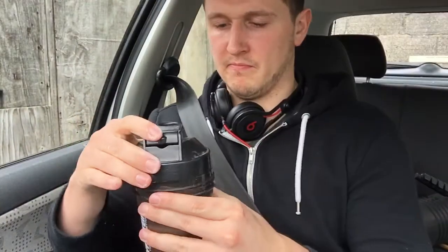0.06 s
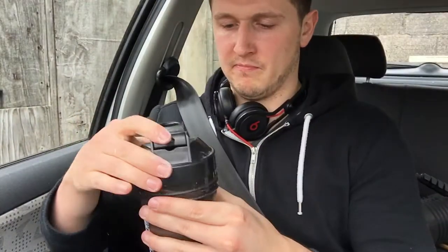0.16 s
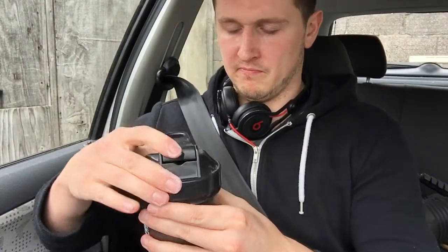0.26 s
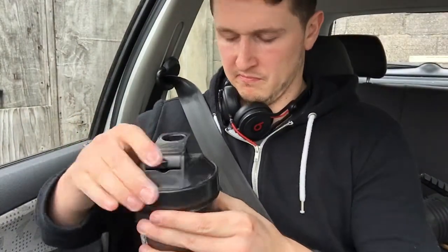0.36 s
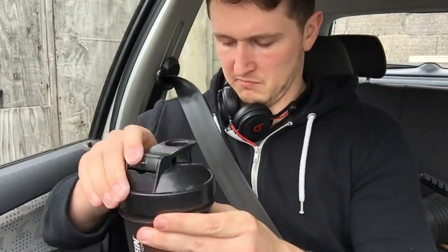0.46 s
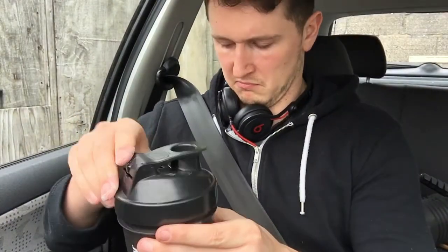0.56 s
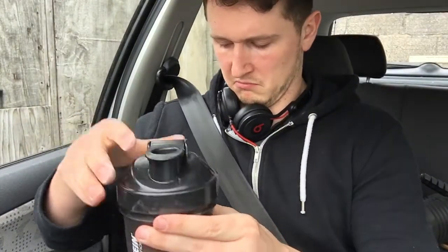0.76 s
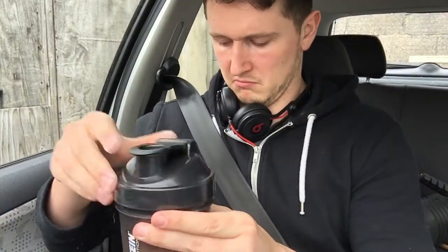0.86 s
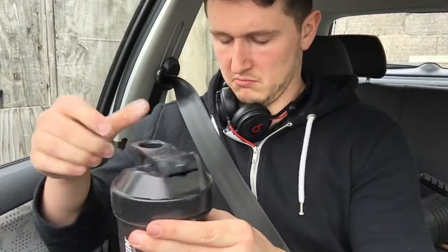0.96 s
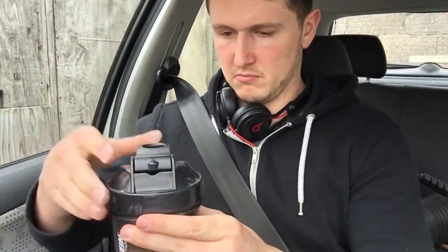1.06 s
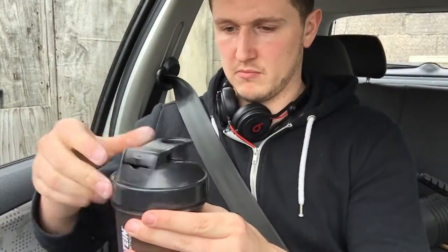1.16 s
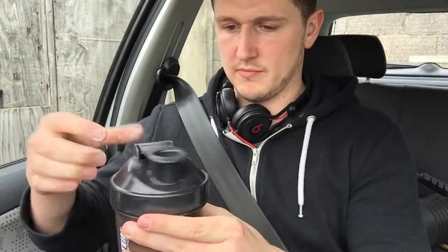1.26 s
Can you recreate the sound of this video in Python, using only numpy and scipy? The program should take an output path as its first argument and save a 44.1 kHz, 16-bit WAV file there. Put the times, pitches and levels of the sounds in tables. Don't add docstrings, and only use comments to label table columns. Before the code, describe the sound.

A plastic shaker bottle is handled close to a phone microphone in a small, dry car cabin. Light clicks lead to a very loud, sharp cap snap with hollow knocks at 0.24-0.28 seconds, then a smaller bounce at 0.38. From 0.42 to about 1.3, quieter uneven clicks, ticks and lid knocks rattle in flurries. A low idling-engine drone, rumble and faint hiss continue throughout.

```python
import sys
import numpy as np
from scipy import signal
from scipy.fft import rfft, irfft
from scipy.io import wavfile
from scipy.ndimage import uniform_filter1d

SR = 44100
rng = np.random.default_rng(int(sys.argv[2]) if len(sys.argv) > 2 else 0)


def volts(x):
    e = np.asarray(x, float) / 20
    return 10 ** e


def persist_wave(psi):
    counts = np.round(np.clip(psi, -1, 1) * 32767).astype(np.int16)
    wavfile.write(sys.argv[1], SR, np.atleast_2d(counts).T)


N = 57330

# start in seconds, peak in dB, ringing pitch in Hz,
# treble in dB, time for the ring to fall 60 dB in seconds.
CAP_SNAPS = [(.231, -25, 1490, -1, 0.022), (.3785, -15, 3340, -27, 0.014), (.238, -6.5, 2458, -8, 0.031),
             (.2475, 2.5, 6380, -2.5, 0.0061), (.248, 2, 1910, -21, 0.007), (.2495, -10, 3260, 2, 0.024),
             (.256, -7, 3566, -3.5, 0.013), (.2585, 2, 1404, -11.5, 0.013), (.2595, -15, 4000, 8, 0.0098),
             (.267, -15.5, 1300, -18, 0.029), (.276, -2, 3970, -23, 0.0054), (.279, -17, 1485, -13, 0.019),
             (.287, -23, 1130, -32, 0.022), (.377, -9, 4170, -11.5, 0.0099), (.375, -33, 2240, -16, .015),
             (.3775, -13, 1473, -18, 0.012), (.378, -12.5, 2277, -28, 0.01), (.379, -24, 2446, -37, 0.036)]
# start in seconds, peak in dB, ringing pitch in Hz,
# treble in dB, time for the ring to fall 60 dB in seconds.
LID_KNOCKS = [(0.041, -42, 2600, -7, 0.021), (0.107, -26, 3760, -2, 0.021),
              (0.127, -16, 1550, -5.5, 0.0029), (0.202, -28, 2400, -5, 0.0046),
              (0.495, -22.5, 2905, -9, 0.02), (0.502, -19.5, 1650, 0.5, 0.011),
              (0.5275, -14, 2820, -5, 0.016), (0.549, -37, 1730, 3, 0.021), (0.615, -40, 2360, -26, 0.015),
              (0.64, -29.5, 3940, -22, 0.067), (0.681, -25, 4100, -20, 0.025),
              (0.698, -17.5, 2450, -43, 0.016), (0.708, -15, 3200, -14, 0.01),
              (0.726, -36, 6040, -6, 0.008), (0.748, -33, 2480, -10, 0.037), (0.4697, -26, 2440, -10, 0.02),
              (0.833, -37, 2430, -5, 0.023), (0.863, -28, 2520, 1, 0.014), (0.921, -27, 3270, -8, 0.019),
              (0.942, -24.5, 4130, 1, 0.027), (1.0, -15.5, 2420, -5, 0.01), (1.095, -16, 2870, -25, 0.0017),
              (1.152, -25.5, 2000, -12, 0.0082), (1.261, -25.5, 6180, 12, 0.012),
              (1.278, -17, 2300, -5, 0.0074)]
# pitch in Hz, width in Hz, level in dB.
LID_RESONANCES = [(1300, 50, 3), (1550, 130, 0.5), (1900, 430, 8.5), (2400, 95, 2), (2545, 320, 6),
                  (3057, 540, 6), (3470, 300, 2.5), (3810, 270, -8), (4047, 130, -1), (4290, 270, -1.5),
                  (5470, 570, -10), (5980, 690, -1), (7110, 1000, -5.5)]
# frequency in Hz, level in dB.
CLICK_COLOUR = [(240, -5.5), (400, -58), (496, -31), (536, -23), (607, 0.5), (1420, -16.5), (2400, -6),
                (4050, -5), (16000, -19)]
# frequency in Hz, level in dB.
CRACK_COLOUR = [(180, -58.5), (330, -1.5), (1150, -9.5), (1390, -2), (2100, -4.5), (2480, -13),
                (2740, -7.5), (4020, -7), (16000, -29.5)]
# frequency in Hz, level in dB.
ENGINE_TONES = [(27, -78), (40, -50), (53.8, -37.5), (81, -52), (107.7, -45.5), (134.6, -48),
                (231.5, -54.5)]
# frequency in Hz, level in dB.
CABIN_COLOUR = [(25, 6), (60, -4.5), (190, -9), (300, -12.5), (680, -26), (800, -29), (1900, -32.5),
                (16000, -58)]
# peak time in seconds, rise in seconds, fall in seconds,
# level in dB, brightness in dB.
RATTLE_FLURRIES = [(0.043, 0.0075, 0.17, -51.5, -2.5), (0.126, 0.033, 0.062, -39, -7),
                   (0.226, 0.032, 0.069, -39.5, -11), (0.298, 0.0072, 0.041, -45, -8),
                   (0.362, 0.049, 0.09, -49.5, 0.5), (0.422, 0.037, 0.15, -37.5, -4),
                   (0.498, 0.044, 0.057, -45, -4), (0.53, 0.007, 0.041, -28.5, -5),
                   (0.627, 0.065, 0.051, -37, -5.5), (0.676, 0.073, 0.095, -38.5, 2.5),
                   (0.743, 0.026, 0.065, -39.5, -8), (0.836, 0.0032, 0.017, -48, -4),
                   (0.864, 0.0036, 0.074, -43.5, -4), (0.935, 0.045, 0.11, -40, 4),
                   (1.009, 0.038, 0.098, -37.5, -1.5), (1.1, 0.019, 0.0081, -51.5, 3),
                   (1.151, 0.002, 0.018, -46, 2.5), (1.174, 0.0046, 0.04, -44, 0),
                   (1.204, 0.0098, 0.052, -39.5, 1.5), (1.281, 0.062, 0.11, -48, 9)]
# start in seconds, peak in dB, pitch in Hz,
# time to fall 60 dB in seconds.
CUP_THUMPS = [(0.108, -31.5, 493, 0.02), (0.128, -36.5, 257, 0.059), (0.247, -6, 188, 0.032),
              (.239, -28, 550, 0.04), (0.258, -17.5, 202.5, 0.13), (0.2585, 2, 907, 0.013),
              (.258, -3, 600, 0.0092), (.261, -6, 117, 0.052), (.247, -31, 420, 0.0067),
              (.278, -8.5, 137.4, 0.054), (.278, -17.5, 675, 0.034), (.378, -12, 203, 0.026),
              (.378, -19, 472, 0.029), (.378, -23, 655, 0.046), (1.06, -33, 540, 0.016),
              (0.619, -31.5, 185, 0.072), (0.701, -28.5, 204.6, 0.14), (0.712, -29, 149, 0.094),
              (0.866, -27.5, 134, 0.083), (.866, -35, 646, 0.017), (.993, -36, 634, 0.031),
              (1.003, -45, 790, 0.026), (1.101, -21, 145, 0.043), (1.103, -30.5, 526, 0.023),
              (1.103, -33.5, 640, 0.022), (1.153, -35.5, 513, 0.027), (1.279, -32.5, 447, 0.03),
              (1.28, -27.5, 205, 0.041), (1.215, -32.5, 470, 0.014)]
# start in seconds, peak in dB, pitch in Hz,
# time to fall 60 dB in seconds.
BALL_TICKS = [(0.1078, -54, 3670, 0.0099), (0.1262, -27.5, 4150, 0.013), (0.1277, -37, 5810, 0.014),
              (0.1282, -33.5, 6890, 0.014), (0.1292, -27, 1550, 0.019), (0.4949, -46, 9500, 0.012),
              (0.4949, -34.2, 2980, 0.012), (0.5273, -34, 9280, 0.014), (0.5273, -30, 5300, 0.017),
              (0.5278, -27.8, 1670, 0.0075), (0.5517, -22.5, 1776, 0.015), (0.6151, -30, 4320, 0.012),
              (0.6161, -33.6, 3500, 0.012), (0.6246, -36, 2497, 0.013), (0.6321, -26.5, 2520, 0.014),
              (0.6615, -20.5, 3910, 0.013), (0.663, -43.0, 9100, 0.014), (0.663, -43, 6100, 0.011),
              (0.6685, -29, 7040, 0.013), (0.6795, -30, 4100, 0.013), (0.6969, -21.5, 2810, 0.011),
              (0.7099, -43, 3160, 0.012), (0.7348, -28.5, 2433, 0.023), (0.7473, -28.5, 6200, 0.014),
              (0.8635, -36, 5800, 0.014), (0.8645, -37, 3703, 0.012), (0.866, -32, 2411, 0.016),
              (0.9214, -37.9, 6030, 0.011), (0.9279, -26.5, 3420, 0.016), (0.9299, -32, 2300, 0.014),
              (0.9434, -29, 4134, 0.012), (0.9444, -36, 9250, 0.013), (0.9458, -31, 7200, 0.014),
              (0.9468, -35.4, 5800, 0.012), (0.9808, -38, 3200, 0.0092), (1.0002, -20, 5270, 0.011),
              (1.0012, -43, 2460, 0.0096), (1.0172, -29, 5400, 0.015), (1.0955, -38, 5540, 0.014),
              (1.099, -48, 3920, 0.012), (1.2003, -33, 4100, 0.012), (1.2023, -30, 2400, 0.019),
              (1.2147, -48, 4048, 0.012), (1.2162, -32, 2300, 0.012), (1.2437, -25, 2497, 0.014),
              (1.2746, -40, 4040, 0.012), (1.2796, -43, 5943, 0.012), (1.2811, -22, 2480, 0.012)]

ATTACK_S, CRACK_DB = 0.0016, -7.5
CRACK_FOLLOWS = 0.18
CLICKS_PER_S, CLICK_SPREAD_DB, SMEAR_S = 1300, 2.5, 0.0015
FLURRY_WANDER_DB, LID_WANDER_DB = 2, 5.5
LID_DB, BROAD_DB = -1.5, -8.5
TICK_PUSH_S, THUMP_PUSH_S, BOOM_LOW_HZ = 0.0008, 0.00083, 99.5
ROOM_T60_S, ROOM_DB = 0.084, -11.5
CABIN_DB, CABIN_WANDER_DB, DRONE_WANDER_DB = -44.5, 1.3, 3


def unit(x):
    return x / np.sqrt(np.mean(x ** 2))


def colour(x, table, treble_db=0.0):
    log_hz = np.log(np.maximum(np.arange(513) * SR / 1024, 10))
    points = np.array(table, float)
    shape_db = np.interp(log_hz, np.log(points[:, 0]), points[:, 1])
    shape_db = shape_db + treble_db * np.clip(log_hz - np.log(4000), 0, 1)
    cepstrum = np.fft.irfft(np.log(volts(shape_db)))
    cepstrum[1:512] *= 2
    cepstrum[513:] = 0
    impulse = np.fft.irfft(np.exp(np.fft.rfft(cepstrum)))
    return signal.fftconvolve(x, impulse)[:len(x)]


def resonance(x, hz, t60):
    pole = np.exp(2j * np.pi * hz / SR - np.log(1000) / (t60 * SR))
    return signal.lfilter([1], [1, -pole], x).imag


def wander(rate_hz):
    k = int(SR / rate_hz)
    steps = np.repeat(rng.standard_normal(N // k + 1), k)
    smooth = uniform_filter1d(uniform_filter1d(steps, k), k)
    return unit(smooth[:N])


def rings(rows, push_s):
    t = np.arange(N) / SR
    out = np.zeros(N)
    for start, db, hz, t60 in rows:
        after = np.maximum(t - start, 0)
        push = 1 - np.exp(-after / push_s)
        out += volts(db - 60 * after / t60) * push * np.sin(2 * np.pi * hz * after)
    return out


def blows(rows, tick_db, ring_db, rough, crack_t60):
    out = np.zeros(N)
    n = np.arange(4096)
    t = n / SR
    rise = 1 - np.exp(-t / ATTACK_S)
    for start, db, hz, treble_db, t60 in rows:
        tick = volts(tick_db) * (n // 4 == 4)
        grit = rng.standard_normal(len(t)) * (rise + tick)
        crack_level = volts(CRACK_FOLLOWS * (treble_db + 6) - 60 * t / crack_t60)
        crack = unit(colour(grit, CRACK_COLOUR, treble_db + 9)) * crack_level
        chatter = 1 + rough * unit(uniform_filter1d(grit, size=40))
        ring = rise * chatter * np.sin(2 * np.pi * hz * t) * volts(-60 * t / max(t60, 2e-3))
        blow = volts(db) * (volts(CRACK_DB) * crack + volts(ring_db) * ring)
        i = int(start * SR)
        out[i:i + len(t)] += blow[:N - i]
    return out


def cap_snaps():
    return blows(CAP_SNAPS, tick_db=7, ring_db=2, rough=0.22, crack_t60=0.023)


def lid_knocks():
    return blows(LID_KNOCKS, tick_db=0, ring_db=-2, rough=0.41, crack_t60=0.011)


def clicks():
    uneven = volts(CLICK_SPREAD_DB * np.minimum(rng.exponential(size=N), 3.5))
    size = uneven * (rng.random(N) < CLICKS_PER_S / SR)
    power = signal.lfilter([1], [1, -np.exp(-1 / (SMEAR_S * SR))], size ** 2)
    return np.sqrt(power) * rng.standard_normal(N)


def rattle():
    t = np.arange(N) / SR
    swell, bright_swell = np.zeros(N), np.zeros(N)
    for peak, rise, fall, db, bright_db in RATTLE_FLURRIES:
        distance = np.where(t < peak, (peak - t) / rise, (t - peak) / fall)
        flurry = volts(db - 20 * distance ** 1.414)
        swell += flurry
        bright_swell += flurry * volts(bright_db)
    lid = np.zeros(N)
    for hz, width, db in LID_RESONANCES:
        level = volts(db + LID_WANDER_DB * np.tanh(wander(71.02)))
        lid += level * unit(resonance(clicks(), hz, 3.7 / width))
    lid = unit(np.diff(lid, prepend=0))
    broad = unit(colour(clicks(), CLICK_COLOUR))
    full = volts(FLURRY_WANDER_DB * wander(89.8)) * (volts(LID_DB) * lid + volts(BROAD_DB) * broad)
    dull = signal.lfilter(*signal.butter(2, 5000, fs=SR), full)
    return swell * dull + bright_swell * (full - dull)


def ball_ticks():
    chatter = unit(uniform_filter1d(rng.standard_normal(N), size=30))
    return rings(BALL_TICKS, TICK_PUSH_S) * (1 + 0.7 * chatter)


def cup_thumps():
    low_cut = signal.butter(4, BOOM_LOW_HZ, "high", fs=SR, output="sos")
    return signal.sosfilt(low_cut, rings(CUP_THUMPS, THUMP_PUSH_S))


def cabin_tail(bottle):
    t = np.arange(6000) / SR
    tail = rng.standard_normal(len(t)) * volts(-60 * t / ROOM_T60_S) * (t > 0.002)
    tail = tail / np.sqrt(np.sum(tail ** 2))
    return volts(ROOM_DB) * signal.fftconvolve(bottle, tail)[:N]


def engine_drone():
    t = np.arange(N) / SR
    out = np.zeros(N)
    for hz, db in ENGINE_TONES:
        level = np.sqrt(2) * volts(db + DRONE_WANDER_DB * wander(13.74))
        out += level * np.sin(2 * np.pi * (hz * t + rng.random()))
    return out


def cabin_noise():
    log_hz = np.log(np.maximum(np.arange(N // 2 + 1) * SR / N, 5))
    points = np.array(CABIN_COLOUR, float)
    shape = volts(np.interp(log_hz, np.log(points[:, 0]), points[:, 1], left=-60))
    noise = unit(irfft(rfft(rng.standard_normal(N)) * shape, N))
    return volts(CABIN_DB + CABIN_WANDER_DB * wander(8.1)) * noise


def scene():
    bottle = cap_snaps() + lid_knocks() + rattle() + ball_ticks()
    background = engine_drone() + cabin_noise()
    return (bottle + cabin_tail(bottle) + cup_thumps() + background)[None]


def band_limit(x):
    return signal.sosfilt(signal.butter(12, 16440, fs=SR, output="sos"), x)


def record(dry):
    rounded = 0.86 * np.tanh(dry / 0.86)
    top_cut = signal.ellip(10, 0.2, 90, 15800, fs=SR, output="sos")
    return band_limit(signal.sosfilt(top_cut, rounded))


dry = scene()
out = record(dry)
persist_wave(out)
```